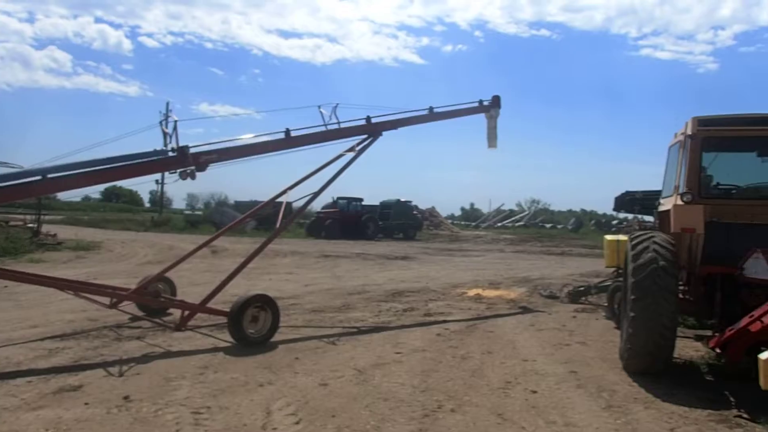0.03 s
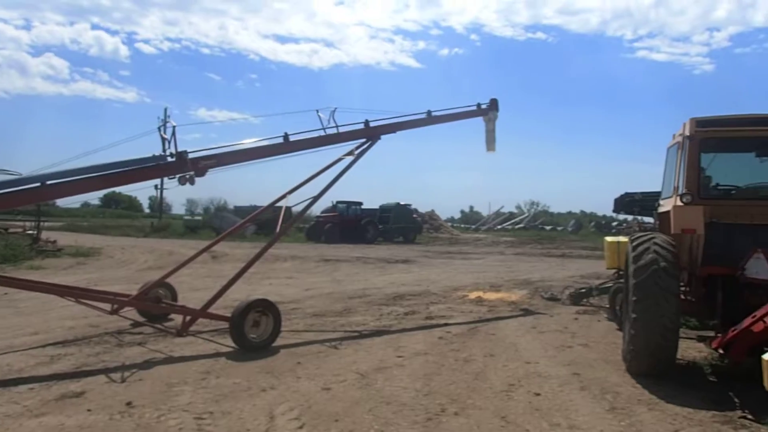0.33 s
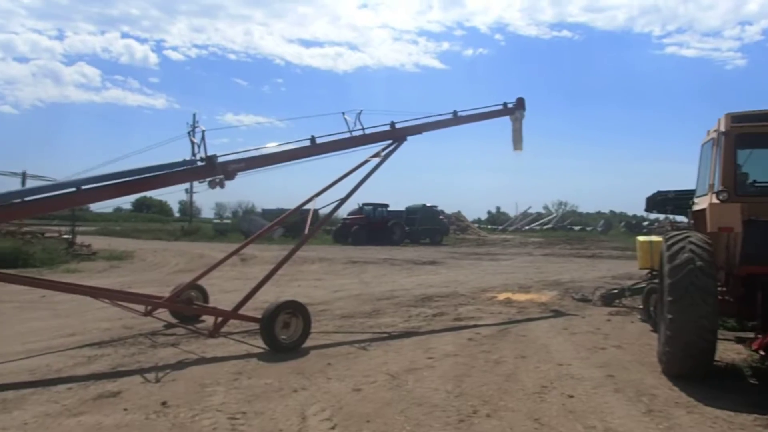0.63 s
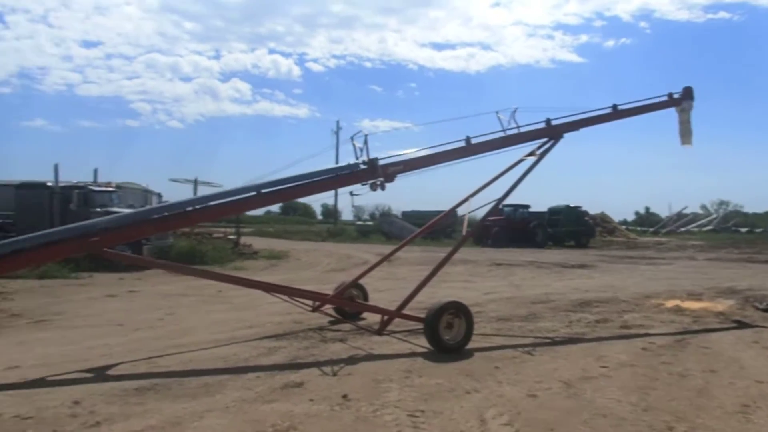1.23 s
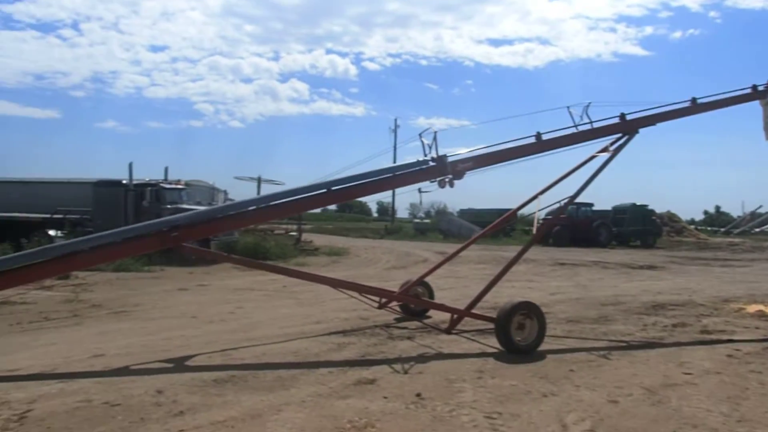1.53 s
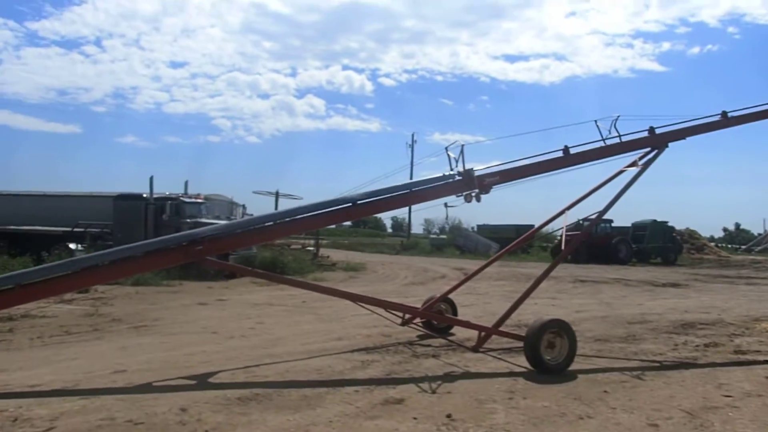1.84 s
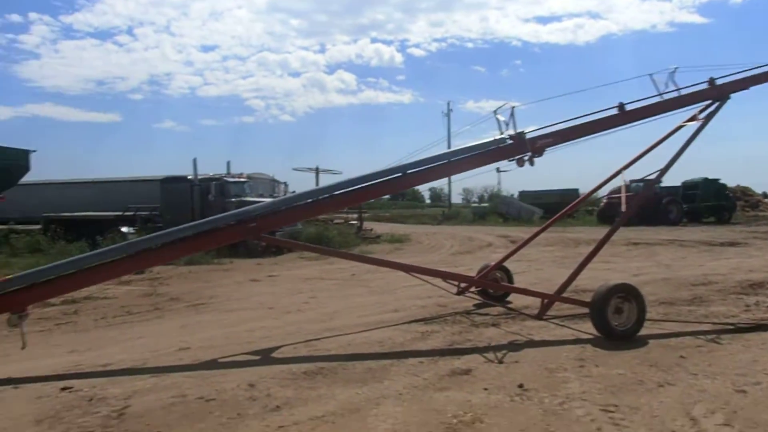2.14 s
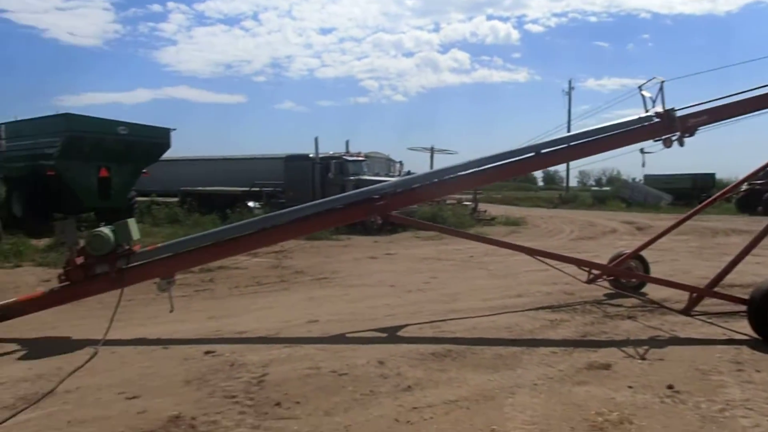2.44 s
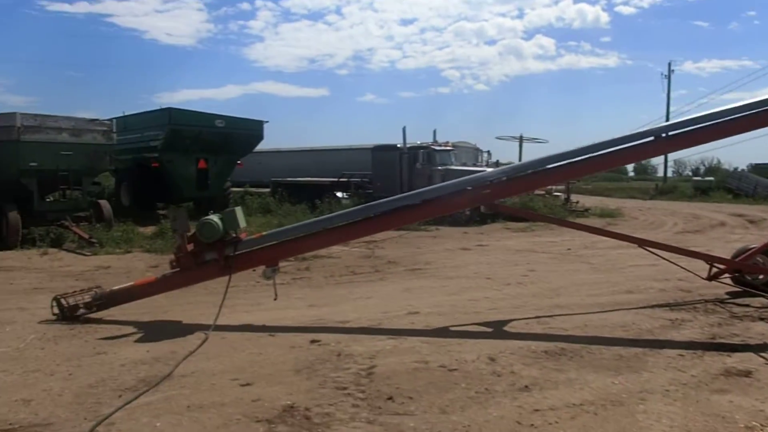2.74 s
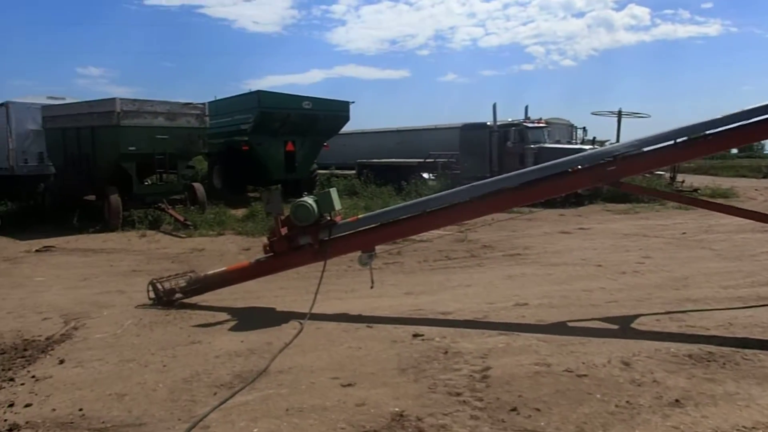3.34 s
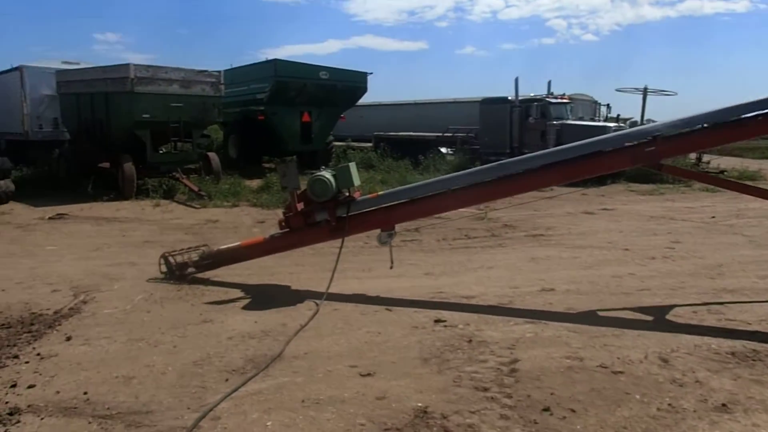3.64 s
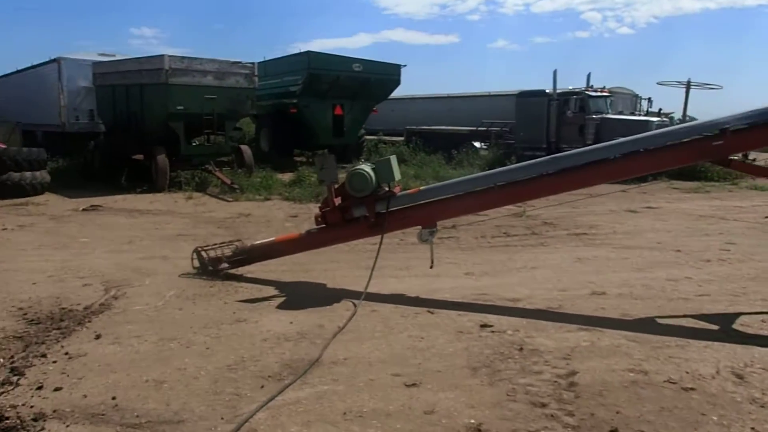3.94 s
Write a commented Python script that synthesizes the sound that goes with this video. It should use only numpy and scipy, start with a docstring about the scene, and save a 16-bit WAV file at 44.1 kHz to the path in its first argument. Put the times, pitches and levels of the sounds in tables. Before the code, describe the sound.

A grain auger cuts in abruptly and runs loudly in an open farmyard, mostly on the left. Countless tiny impacts in its steel tube make a hissing rattle over hollow churning, dulling slightly toward the end.

```python
"""A grain auger runs in an open farmyard, starting abruptly and heard mostly on the left.
Thousands of tiny impacts in its steel tube make a bright, hissing rattle over a hollow churning.
Both swell in uneven surges about ten times a second, and gritty ticks come in sudden spurts.
As the listener turns, the highest rattle dulls and the tube's hollow notes come forward."""
import sys
import numpy as np
from scipy import signal
from scipy.fft import rfft, irfft
from scipy.io import wavfile

SR = 44100
rng = np.random.default_rng(int(sys.argv[2]) if len(sys.argv) > 2 else 0)


def inscribe(sig):
    """Save sig as 16-bit PCM at rate SR to the path in sys.argv[1].

    A 1-D sig is mono; a 2-D sig holds one channel per row.
    Samples are clipped to [-1, 1] before scaling.
    """
    pcm = np.round(np.clip(np.atleast_2d(sig).T, -1, 1) * 32767)
    wavfile.write(sys.argv[1], SR, pcm.astype(np.int16))


N = 176400
T = np.arange(N) / SR
HZ = np.maximum(np.arange(N // 2 + 1) * SR / N, 1)
START_S = 0.2195

# Loudness between surges. Each row: time in seconds, then rattle, churning and sizzle levels in dB.
RUNNING_LEVELS = [(.25, -19.5, -26.5, -24), (.6, -19, -25, -25.5), (.95, -21, -29, -27),
                  (1.35, -21, -27, -27), (1.55, -21, -28, -25.5), (1.95, -20.5, -27.5, -24.5),
                  (2.25, -19, -27, -25.5), (2.65, -22.5, -28.5, -30), (3.05, -20.5, -27, -28.5),
                  (3.35, -19.5, -27, -28), (3.6, -19, -26, -28.5), (3.95, -21, -27.5, -28)]


def from_db(db):
    """Turn decibels into a number to multiply the sound by."""
    return 10 ** (np.asarray(db) / 20)


def rms_one(x):
    """Scale a sound so that its average power is 1."""
    return x / np.sqrt(np.mean(x ** 2) + 1e-20)


def over_time(rows, column=1):
    """Read one column of a table at every moment."""
    columns = np.transpose(rows)
    return np.interp(T, columns[0], columns[column])


def over_hz(rows):
    """Read a table at every frequency."""
    hz, value = np.transpose(rows)
    return np.interp(np.log(HZ), np.log(hz), value)


def colour(x, db):
    """Turn each frequency up or down, so that ringing only follows a hit (a minimum-phase filter)."""
    cepstrum = irfft(np.log(from_db(db)), N)
    cepstrum[1:N // 2] *= 2
    cepstrum[N // 2 + 1:] = 0
    return irfft(rfft(x) * np.exp(rfft(cepstrum)), N)


def resonate(x, hz, width_hz):
    """Make a sound ring near one pitch, as if it passed twice through a filter of this width."""
    one_pass_db = -10 * np.log10(1 + ((HZ ** 2 - hz ** 2) / (HZ * width_hz)) ** 2)
    return rms_one(colour(x, 2 * one_pass_db))


def drift(rate_hz):
    """A smooth random wobble with a typical size of 1."""
    return rms_one(irfft(rfft(rng.standard_normal(N)) / (1 + (HZ / rate_hz) ** 2), N))


def hump(middle_s, half_s):
    """One smooth, bell-shaped rise and fall."""
    return np.exp(-0.5 * ((T - middle_s) / half_s) ** 2)


def ticks(per_s, spread_db):
    """Clicks of uneven size at random moments."""
    sizes = from_db(spread_db * np.minimum(rng.exponential(1, N), 4))
    signs = rng.choice([-1, 1], N)
    return rms_one(sizes * signs * (rng.random(N) < per_s / SR))


def impacts():
    """Two streams of clicks, direct and scattered, each on a blur of countless smaller ones."""
    streams = []
    for _ in range(2):
        clicks = ticks(per_s=3400, spread_db=2.5)
        blur = from_db(-1.5) * rng.standard_normal(N)
        streams.append(rms_one(clicks + blur))
    return np.array(streams)


def impact_layer(tone_rows, level_db, flutter_db, flutter_hz, ring_db=-17.5, ring_s=0.066):
    """Dense impacts, given a tone and a brief ring; fixed narrow dips hollow out the sound."""
    # Narrow dips in the tone. Each row: pitch in Hz, width in Hz, depth in dB.
    dips = [(1861, 114, -11), (2600, 240, -1.5), (3387, 160, -7.5), (4790, 132, -16)]
    dips_db = sum(db / (1 + (2 * (HZ - hz) / width) ** 2) for hz, width, db in dips)
    gain = from_db(level_db + flutter_db * drift(flutter_hz))
    hits = impacts()
    tail = rng.standard_normal(N) * from_db(-60 * np.minimum(T / ring_s, 2))
    ringing = from_db(ring_db) * irfft(rfft(hits) * rfft(tail / np.linalg.norm(tail)), N)
    return gain * rms_one(colour(hits + ringing, over_hz(tone_rows) + dips_db))


def intake():
    """Impacts ring in the tube's hollow lower end, louder as the listener turns to face it."""
    # The hollow notes. Each row: pitch in Hz, half the filter width in Hz, level in dB.
    notes = [(440, 61, -43), (1437, 160, -35.5)]
    # The listener's turn. Each row: time in seconds, change of level in dB.
    facing = [(1.6, -12), (2.5, 0)]
    hits = impacts()
    ringing = sum(from_db(db) * resonate(hits, hz, 2 * half_width) for hz, half_width, db in notes)
    return ringing * from_db(over_time(facing))


def knock(start_s=0.277, hz=682, level_db=-16.5, decay_s=0.012):
    """A single blow rings one low note of the tube."""
    age = np.maximum(T - start_s, 0)
    return from_db(level_db) * np.exp(-age / decay_s) * np.sin(2 * np.pi * hz * age)


def grit(surge, spurt):
    """Fine, dry ticks on the steel, loudest in surges and spurts."""
    # Tone of the ticks. Each row: frequency in Hz, relative level in dB.
    tone = [(5000, -24), (8700, 4), (9700, -1), (10500, 2), (11300, -5.5), (16000, -15)]
    clicks = np.array([ticks(per_s=2400, spread_db=3.5) for _ in range(2)])
    gain = from_db(-51.5) * (1 + 0.92 * surge + 3.5 * spurt)
    return gain * rms_one(colour(clicks, over_hz(tone)))


def pings(surge):
    """Impacts ring one high note of the steel, which sings out in the surges."""
    # Loudness between surges. Each row: time in seconds, level in dB.
    levels = [(2.2, -38), (2.9, -32.5), (3.95, -30)]
    ringing = resonate(impacts(), hz=5910, width_hz=600)
    return ringing * from_db(over_time(levels)) * (1 + 1.85 * surge)


def clatter(surge, judder_db):
    """Impacts make a dry clatter, pitched between the churning and the rattle."""
    # Tone of the clatter. Each row: frequency in Hz, relative level in dB.
    tone = [(500, -27.5), (1100, -6.5), (1700, 2), (2150, 3.5), (2650, -9.5), (3100, -4.5), (3700, -1),
            (5000, -37)]
    # Loudness between surges. Each row: time in seconds, level in dB.
    levels = [(.25, -32), (.7, -30), (1.0, -35), (3.95, -37.5)]
    level_db = over_time(levels) + judder_db
    return impact_layer(tone, level_db, flutter_db=1.0, flutter_hz=22) * (1 + 0.24 * surge)


def churning(surge, judder_db):
    """Impacts sound the hollow body of the tube, with the odd heavier lump."""
    # Tone of the tube's body. Each row: frequency in Hz, relative level in dB.
    tone = [(45, -33), (100, -17.5), (192, -5.5), (240, -6), (465, -7), (520, -1), (570, -3.5), (620, -0.5),
            (700, -3), (790, -0.5), (890, -5.5), (1150, -4), (1420, -2.5), (1750, -6), (2100, -10),
            (2550, -20), (8000, -47.5)]
    # Heavier lumps. Each row: middle in seconds, strength in dB, half length in seconds.
    lumps = [(2.875, -11, .012), (3.335, -8, 0.035)]
    lump = sum(from_db(db) * hump(s, half_s) for s, db, half_s in lumps)
    level_db = over_time(RUNNING_LEVELS, column=2) + judder_db
    return impact_layer(tone, level_db, flutter_db=0.3, flutter_hz=22) * (1 + 0.24 * surge + lump)


def sizzle(surge, judder_db):
    """The sharpest impacts make the hissing top of the rattle."""
    # Tone of the hiss. Each row: frequency in Hz, relative level in dB.
    tone = [(3000, -36.5), (5600, -26), (6800, 5), (7400, 0.5), (7850, 1.5), (8400, -8.5), (9700, -28.5),
            (11000, -35), (16000, -43)]
    level_db = over_time(RUNNING_LEVELS, column=3) + judder_db
    return impact_layer(tone, level_db, flutter_db=1.67, flutter_hz=30.7) * (1 + 0.57 * surge)


def rattle(surge, judder_db):
    """The steel rings brightly under the stream of impacts."""
    # Tone of the steel. Each row: frequency in Hz, relative level in dB.
    tone = [(1200, -37), (2700, -21), (3100, -12.5), (3350, -15.5), (3680, -10), (3950, -16), (4250, -12.5),
            (4550, -3), (5000, -2.5), (5450, 0), (5900, 0), (6400, -3), (7200, -12.5), (8500, -24),
            (16000, -56.5)]
    level_db = over_time(RUNNING_LEVELS, column=1) + judder_db
    return impact_layer(tone, level_db, flutter_db=0.5, flutter_hz=25) * (1 + 0.56 * surge)


def auger(spurt_decay_s=0.015, lull_db=-2.5):
    """The whole machine: its main layers surge and judder together."""
    # Surges of impacts. Each row: middle in seconds, relative strength in dB, half length in seconds.
    surges = [(0.234, -4.5, 0.0095), (0.29, -2, 0.015), (0.417, 0.5, 0.017), (0.495, -2, 0.011),
              (0.533, -3, 0.014), (0.602, -3, 0.024), (0.69, -3.5, 0.015), (0.73, -4.5, 0.031),
              (0.82, -2, .014), (0.886, -2, 0.0069), (.925, 4, 0.0073), (1.015, -2.5, 0.017),
              (1.083, -0.5, 0.0083), (1.12, -4, 0.0069), (1.193, -3, 0.028), (1.301, 1, 0.014),
              (1.4, -3.5, 0.021), (1.513, -5, 0.018), (1.571, -5, 0.018), (1.645, -3, 0.015),
              (1.702, -2.5, 0.016), (1.759, 0.5, 0.012), (1.812, 2.5, 0.0061), (1.873, -6, 0.0071),
              (2.073, -7.5, 0.024), (2.253, -7.5, 0.021), (2.414, 2.5, 0.0083), (2.487, -2.5, 0.022),
              (2.592, 5, 0.008), (2.677, -0.5, 0.023), (2.8, -1.5, 0.027), (2.862, -0.5, 0.012),
              (2.896, 2.5, 0.0089), (2.962, -1, 0.007), (3.057, -1.5, 0.0085), (3.087, -3, 0.01),
              (3.167, -3, 0.01), (3.365, -8, 0.016), (3.688, -7, 0.011), (3.72, -3, 0.0054),
              (3.872, -1, 0.016), (3.926, .5, 0.0062), (3.989, -1, 0.01)]
    # Spurts of hard ticks. Each row: start in seconds, relative strength in dB.
    spurts = [(.48, -7), (.684, -4), (2.054, -4), (2.764, -3), (2.959, 3), (3.246, 6), (3.347, 0),
              (3.44, 1), (3.674, -3)]
    # Moments when the rattle briefly eases. Each entry: time in seconds.
    lulls = [.655, .87, 1.93, 3.02, 3.742, 3.815]
    surge = sum(from_db(db) * hump(s, half_s) for s, db, half_s in surges)
    spurt = sum(from_db(db) * (T >= s) * np.exp(-np.maximum(T - s, 0) / spurt_decay_s)
                for s, db in spurts)
    easing = from_db(lull_db * sum(hump(s, half_s=0.0044) for s in lulls))
    judder_db = 0.5 * drift(rate_hz=43)
    steel = rattle(surge, judder_db)
    body = churning(surge, judder_db) + clatter(surge, judder_db)
    steel += sizzle(surge, judder_db) + pings(surge)
    bright = steel * (1 + 0.26 * spurt) + grit(surge, spurt)
    return bright * easing + body + intake() + knock()


def sudden_start(x, boost_s=0.013, crack_s=0.0052, thump_s=0.0099, thump_hz=45.3):
    """Silence, then the sound bursts in with a bright crack and a low thump that fade quickly."""
    age = np.maximum(T - START_S, 0)
    boost = from_db(5.5 * np.exp(-age / boost_s))
    hiss = resonate(rng.standard_normal((2, N)), hz=8200, width_hz=4100)
    crack = from_db(-10.5) * np.exp(-age / crack_s) * hiss
    thump = from_db(-23.5) * np.exp(-age / thump_s) * np.sin(2 * np.pi * thump_hz * age)
    return (T >= START_S) * (x * boost + crack - thump)


def scene(right_lag_s=0.00004, bass_lag_hz=350):
    """The left ear hears the auger fully; on the right it is late, dull and faint."""
    # The right ear's tone. Each row: frequency in Hz, level against the left ear in dB.
    right_tone = [(30, -24), (65, 3), (180, -5.5), (400, -6.5), (750, -12), (1550, -18), (2650, -23),
                  (4000, -35.5), (4600, -43), (4800, -52), (4950, -39), (6300, -26.5), (7300, -35),
                  (8000, -30), (9000, -36), (15000, -29)]
    # How alike the ears sound. Each row: frequency in Hz, likeness from 0 to 1.
    likeness = [(30, 0.6), (150, 0.99), (700, 0.98), (1400, 0.87), (2000, .55), (3300, .75), (4600, 0.2),
                (6600, 0.3), (8500, .1)]
    direct, scattered = sudden_start(auger())
    alike = np.clip(over_hz(likeness), 0, 1)
    lag_angle = 2 * np.pi * HZ * right_lag_s + np.arctan(HZ / bass_lag_hz)  # low notes lag most
    blend = alike * np.exp(-1j * lag_angle) * rfft(direct) + np.sqrt(1 - alike ** 2) * rfft(scattered)
    right = irfft(blend * from_db(over_hz(right_tone)), N)
    return np.array([direct, right * (T >= START_S)])


def record(dry):
    """Flatten any peaks beyond full scale, then cut the very highest treble."""
    cutoff_hz = 15700
    treble_cut = signal.ellip(10, 0.1, 80, cutoff_hz, fs=SR, output="sos")
    return signal.sosfilt(treble_cut, np.clip(dry, -1, 1))


dry = scene()
out = record(dry)
inscribe(out)
```